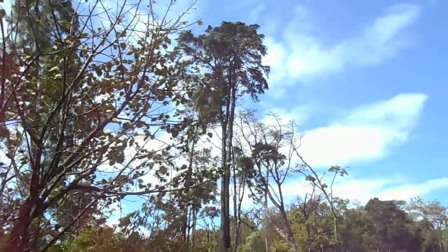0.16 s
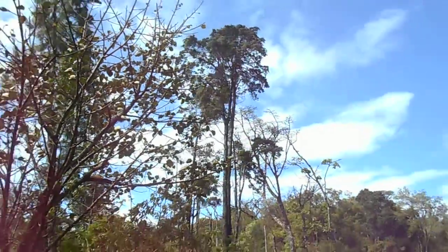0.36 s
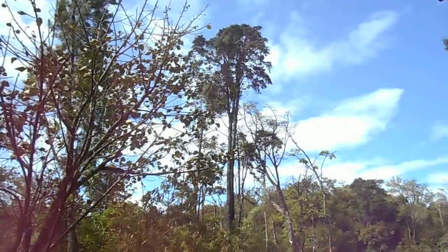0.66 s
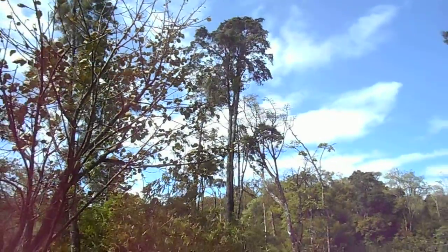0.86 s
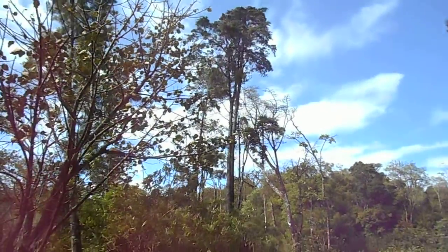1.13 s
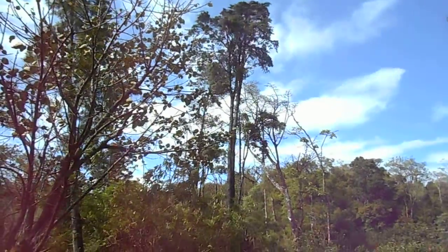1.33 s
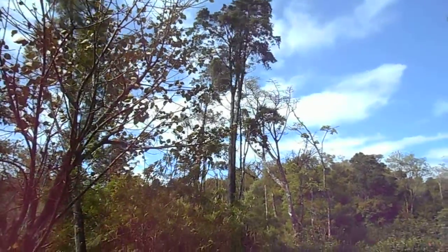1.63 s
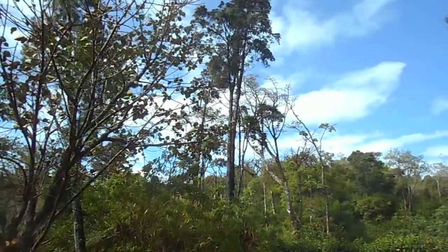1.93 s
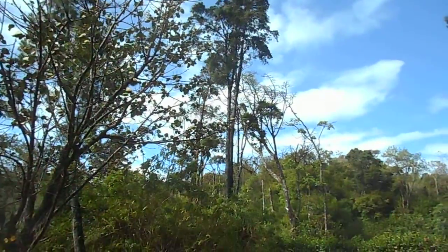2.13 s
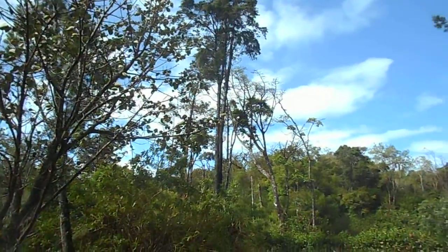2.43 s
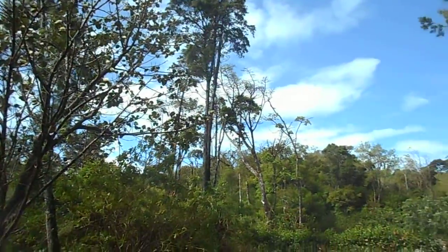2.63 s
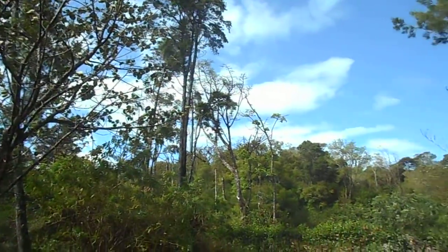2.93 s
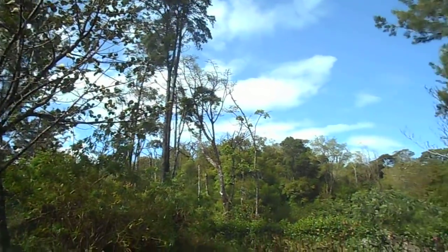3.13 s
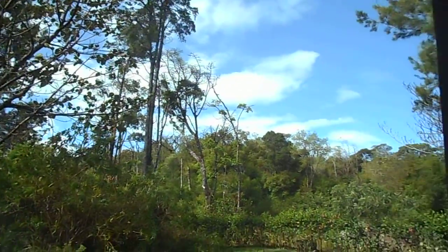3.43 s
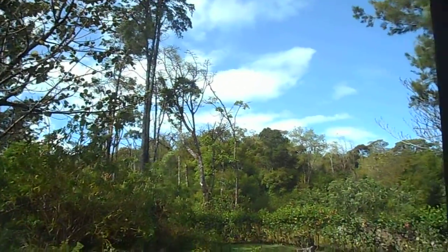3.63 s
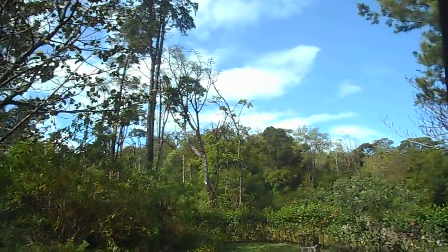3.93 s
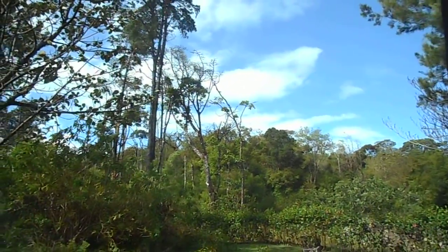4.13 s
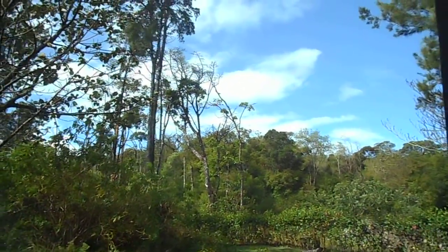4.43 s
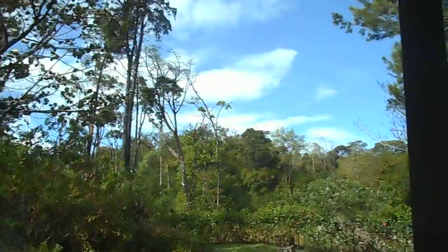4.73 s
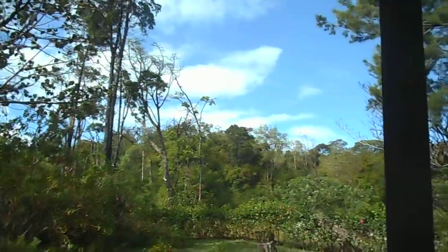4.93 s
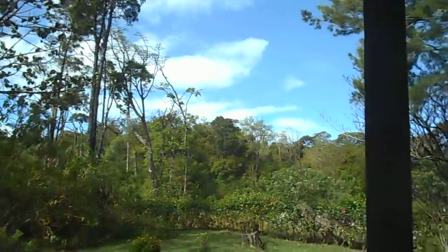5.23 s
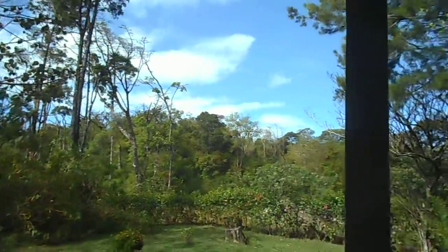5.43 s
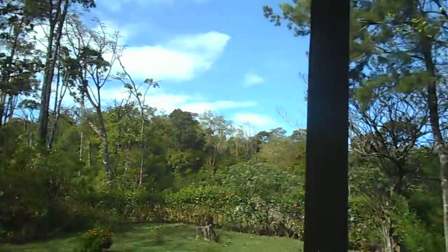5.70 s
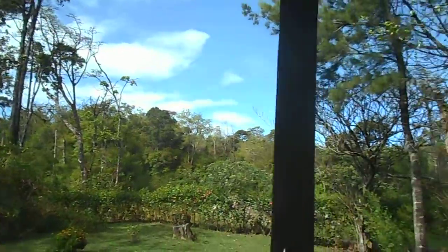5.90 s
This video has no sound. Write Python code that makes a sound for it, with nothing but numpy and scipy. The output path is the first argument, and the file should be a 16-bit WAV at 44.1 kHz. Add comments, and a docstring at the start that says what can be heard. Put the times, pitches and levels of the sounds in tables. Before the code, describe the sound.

Wind rushes steadily through trees, swelling a little toward the end, while a hummingbird repeats brief, high chirps at an even pace. Each is a tiny scratch and a downward whistle, with a soft echo from the foliage. Insects ring very faintly far off, and occasional handling clicks sound close to the microphone, which starts a little muffled and abruptly clears about a third of the way through.

```python
"""Among windy trees, a hummingbird gives short falling chirps, steep and shallow in turn.
Each is a rough scratch and a nearly pure whistle from the syrinx, scattered back by the foliage.
Near leaves hiss with the gusts, far tree tops roar and insects ring faintly.
Small, sharp handling clicks ring in the camera body.
The small microphone is shaded at first and sounds dull, then the treble opens at once."""
import sys
import numpy as np
from scipy import signal
from scipy.fft import rfft, irfft
from scipy.io import wavfile
from scipy.ndimage import uniform_filter1d

SR = 44100
rng = np.random.default_rng(int(sys.argv[2]) if len(sys.argv) > 2 else 0)


def unload_audio(sound):
    """Save the sound as a 16-bit wav file, at the path given as the first command line argument."""
    columns = np.transpose(np.atleast_2d(sound))
    # keep every value between -1 and 1, then stretch to whole-number steps
    steps = np.round(np.clip(columns, -1, 1) * 32767)
    wavfile.write(sys.argv[1], SR, steps.astype(np.int16))


N = 267246

# Chirps: (whistle onset [s], level [dB], glide start [Hz], glide end [Hz], length [s], opening jump [Hz])
CHIRPS = [(0.312, -43.5, 7600, 5560, .022, 150), (.769, -31, 6000, 5340, .029, 600),
          (1.278, -32, 7200, 5250, 0.019, 150), (1.670, -32, 5880, 5180, 0.032, 500),
          (2.293, -26, 7250, 5430, .018, 150), (2.705, -25, 6000, 5190, .025, 800),
          (3.161, -28, 7150, 5430, 0.018, 150), (3.6, -25.5, 6100, 5210, .025, 750),
          (3.996, -25, 7370, 5200, .023, 150), (4.402, -27.5, 6000, 5300, 0.024, 750),
          (4.845, -27, 7100, 5250, 0.022, 150), (5.347, -26, 5930, 5330, 0.024, 900)]
def hummingbird():
    """Source and path: each chirp, a whistle led in by a scratch, travels through the foliage."""
    song = np.zeros(N)
    scratch_s = 0.007
    for onset, db, first_hz, last_hz, length, jump_hz in CHIRPS:
        add(song, onset, gain_of(db) * whistle(first_hz, last_hz, length, jump_hz))
        add(song, onset - scratch_s, gain_of(db) * scratch(first_hz, scratch_s))
    return foliage(song)


def whistle(first_hz, last_hz, length, jump_hz):
    """Frequency modulation: a sine glides downward with a slight tremble of the syrinx."""
    attack_s, hold_s, release_s = 0.0017, 0.0094, 0.0023
    jump_s, drop_s = 0.0035, 0.0012
    t = np.arange(0, length + release_s, 1 / SR)
    tremble = 0.0079 * unit_rms(uniform_filter1d(rng.standard_normal(2400), size=60))[:len(t)]
    # The note opens softly above its glide, then drops onto it.
    opening = np.clip(0.5 + (jump_s - t) / drop_s, 0, 1)
    hz = first_hz + (last_hz - first_hz) * t / length + jump_hz * opening
    cycles = np.cumsum(hz * (1 + tremble)) / SR
    envelope = np.interp(t, [0, attack_s, length, length + release_s], [0, 1, 1, 0])
    fade = np.clip((t - hold_s) / (length - hold_s), 0, 1)
    return envelope * gain_of(-6 * fade - 3 * opening) * np.sin(2 * np.pi * cycles)


def scratch(pitch_hz, length):
    """Amplitude-modulated noise: the voice catches in uneven bursts centred just above its pitch."""
    burst_s = 0.0016
    modulator, carrier = rng.standard_normal((2, 2400))
    gate = np.arange(len(carrier)) < length * SR
    bursts = gate * abs(uniform_filter1d(modulator, size=round(burst_s * SR)))
    rough = steep_band(carrier * bursts, centre_hz=pitch_hz + 500, width_hz=2100)
    return gain_of(-11) * rough / np.sqrt((rough ** 2).sum() / (length * SR))


# Reflections from near branches and the ground: (delay [ms], level [dB])
REFLECTIONS = [(2.23, -10), (5.3, -17), (9.1, -12.5), (14.5, -14.5), (23, -20)]
def foliage(sound, t60=0.58, tail_db=-9):
    """Interference and scattering: near echoes beat with the falling pitch; far ones form a soft tail."""
    response = np.zeros(SR // 2)
    arrivals = np.arange(300, len(response) - 20, 20)
    arrivals += rng.integers(0, 20, len(arrivals))
    response[arrivals] = rng.choice([-1., 1.], len(arrivals)) * gain_of(-60 * arrivals / SR / t60)
    response *= gain_of(tail_db) / np.linalg.norm(response)
    response[0] = 1  # direct sound
    for ms, db in REFLECTIONS:
        response[round(ms * SR / 1000)] += gain_of(db)
    return signal.oaconvolve(sound, response)[:N]


# Handling clicks on the camera; the final row is a short, bright pip that opens the last chirp:
# (time [s], peak level [dB], centre frequency [Hz], 60 dB decay time [s])
TICKS = [(0.5225, -29.5, 3230, 0.06), (0.7808, -32, 1820, 0.011), (1.992, -37, 2690, 0.014),
         (1.9965, -24, 5630, 0.023), (2.175, -31, 2740, 0.015), (2.2418, -24.5, 4300, 0.026),
         (2.2475, -32, 7260, 0.011), (3.946, -25, 3300, 0.016), (5.3104, -23.5, 3430, 0.015),
         (5.331, -20.5, 3520, 0.027), (5.338, -22, 6440, 0.011)]
def handling_ticks():
    """Damped resonance: a snap and a decaying crackle ring in one band of the camera body."""
    track, t = np.zeros(N), np.arange(1500) / SR
    snap = 3.3 * (t == 0)
    width_octaves = 0.91
    edge_ratio = 2 ** (width_octaves / 2)
    for onset, db, hz, t60 in TICKS:
        crackle = (snap + rng.standard_normal(len(t))) * gain_of(-60 * t / t60)
        tick = band(crackle, hz / edge_ratio, hz * edge_ratio)
        add(track, onset, gain_of(db) * tick / abs(tick).max())
    return track


# Wind strength, as the unshaded leaf hiss: (time [s], level [dB])
GUSTS = [(0.0, -44), (0.72, -45.5), (1.45, -44), (1.89, -42), (2.06, -42.5), (3.17, -40), (3.51, -39.5),
         (3.88, -40), (4.47, -38), (4.88, -35.5), (6.06, -38)]
# Hiss of near leaves: (frequency [Hz], relative spectral density [dB])
LEAF_SPECTRUM = [(710, -42.5), (1200, -16), (1330, -12), (2080, -6), (2850, -1), (3920, -1.5), (5320, -0.5),
                 (6430, -2.5), (7640, -8), (8980, -15.5), (9920, -24), (10400, -30), (13500, -54),
                 (22000, -120)]
# Roar of far tree tops: (frequency [Hz], relative spectral density [dB])
TREETOP_SPECTRUM = [(15, -73), (25, -51.5), (185, -27), (421, -13.5), (466, -12), (800, -5.5), (1040, -4.5),
                    (1120, -2.5), (1460, -5), (3000, -6), (3900, -32.5), (6600, -120)]
def wind():
    """Flow noise: near leaves hiss with every gust; the far roar follows only a little."""
    times, levels = np.transpose(GUSTS)
    gust_db = np.interp(np.arange(N) / SR, times, levels)
    roar_db = -49 + 0.21 * (gust_db - levels.max())
    hiss = gain_of(gust_db) * rushing_noise(LEAF_SPECTRUM, patchy_db=0.42, flicker_db=0.25)
    roar = gain_of(roar_db) * rushing_noise(TREETOP_SPECTRUM, patchy_db=0.64, flicker_db=-0.08)
    return hiss + roar


def rushing_noise(spectrum, patchy_db, flicker_db):
    """Spectral shaping: random short-time spectra take on drifting patches and a common flicker."""
    frames, hz = N // 256 + 5, np.fft.rfftfreq(1024, 1 / SR)
    real, imag, patches = rng.standard_normal((frames, len(hz), 3)).T
    patches = uniform_filter1d(patches, size=14, axis=0)  # across frequency
    patches = unit_rms(uniform_filter1d(patches, size=12, axis=1))  # across time
    flicker = unit_rms(uniform_filter1d(rng.standard_normal(frames), size=5))
    level_db = level_at(spectrum, hz)[:, None] + patchy_db * patches + flicker_db * flicker
    _, noise = signal.istft((real + 1j * imag) * gain_of(level_db), nperseg=1024, noverlap=768)
    return unit_rms(noise[:N])


def insects():
    """Incoherent summation: far insects blur into one faint, narrow band of noise."""
    ring = steep_band(rng.standard_normal(N), centre_hz=8180, width_hz=550)
    return gain_of(-66.5) * unit_rms(ring)


def band(x, low_hz, high_hz):
    """Band-pass filtering with a Butterworth response."""
    edges_hz = np.clip([low_hz, high_hz], 300, 11000)
    return signal.sosfilt(signal.butter(2, edges_hz, "bandpass", fs=SR, output="sos"), x)


def steep_band(x, centre_hz, width_hz):
    """Cascading: two equal band-passes double the slopes."""
    edges_hz = centre_hz - width_hz / 2, centre_hz + width_hz / 2
    return band(band(x, *edges_hz), *edges_hz)


def gain_of(db):
    """Amplitude ratio of a level in decibels."""
    return 10 ** (np.asarray(db) / 20)


def unit_rms(x):
    """Normalisation to an rms of 1."""
    return x / np.sqrt(np.mean(x ** 2) + 1e-20)


def level_at(spectrum, hz):
    """Interpolation of a spectrum on a log-frequency axis."""
    frequencies, levels = np.transpose(spectrum)
    return np.interp(np.log(hz + 1), np.log(frequencies + 1), levels)


def add(track, onset, sound):
    """Superposition of a sound on a track, from an onset in seconds."""
    part = track[round(onset * SR):][:len(sound)]
    part += sound[:len(part)]


def scene():
    """Linear superposition: the four sources sum at one microphone."""
    return (wind() + hummingbird() + handling_ticks() + insects())[None]


# Response of the shaded microphone: (frequency [Hz], gain [dB])
SHADE_RESPONSE = [(800, 0.34), (2000, 1), (3500, -2.5), (5500, -7.5), (8000, -9), (10500, -10)]
def record(dry):
    """Acoustic shadowing: the shade takes treble away until it lifts; a low-pass limits the bandwidth."""
    opens_s, opening_takes_s, cutoff_hz = 1.853, 0.0026, 10535
    shade = gain_of(level_at(SHADE_RESPONSE, np.fft.rfftfreq(N, 1 / SR)))
    dull = irfft(rfft(dry) * shade, N)
    lifted = np.clip((np.arange(N) / SR - opens_s) / opening_takes_s, 0, 1)
    heard = dull + lifted * (dry - dull)
    low_pass = signal.firwin(255, cutoff_hz, window=("kaiser", 9), fs=SR)
    return signal.oaconvolve(heard, low_pass[None], "same")


dry = scene()
out = record(dry)
unload_audio(out)
```